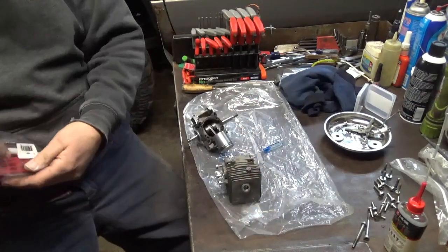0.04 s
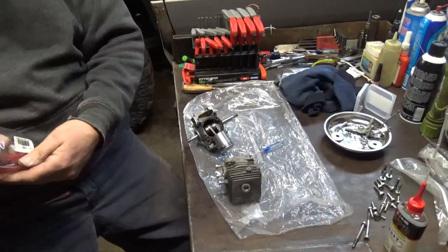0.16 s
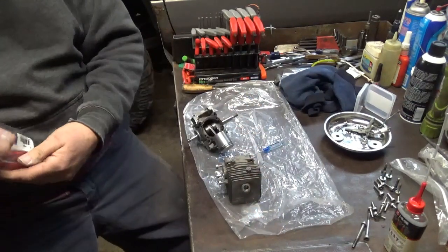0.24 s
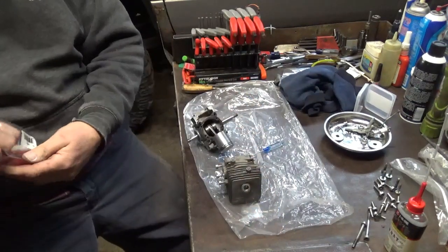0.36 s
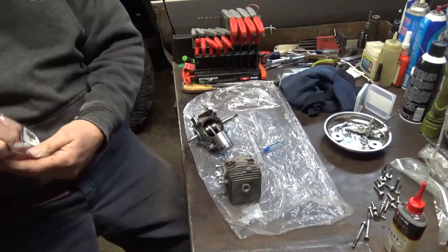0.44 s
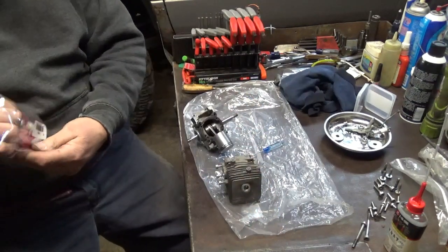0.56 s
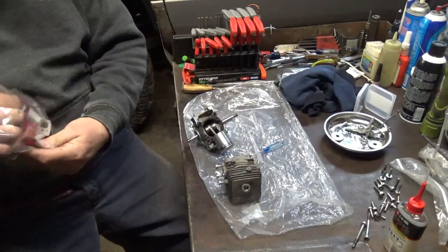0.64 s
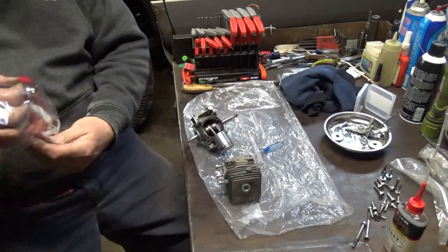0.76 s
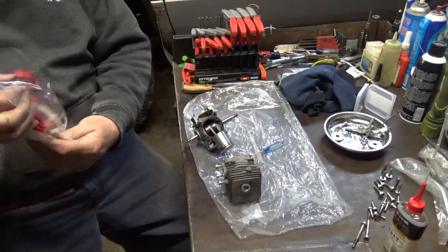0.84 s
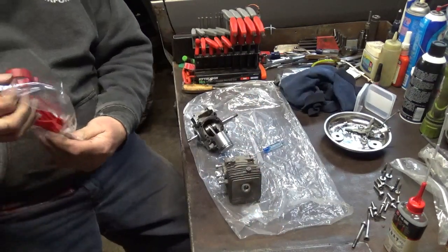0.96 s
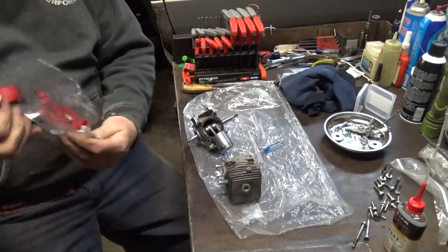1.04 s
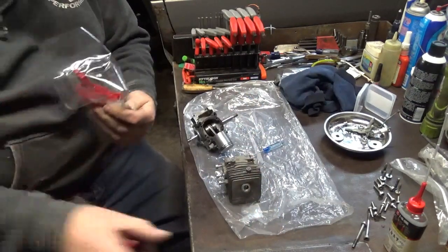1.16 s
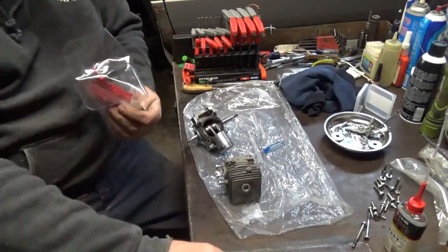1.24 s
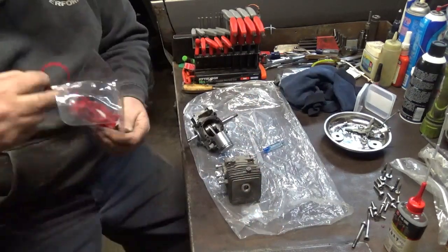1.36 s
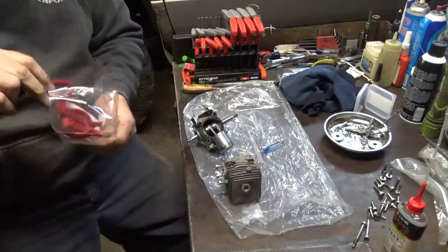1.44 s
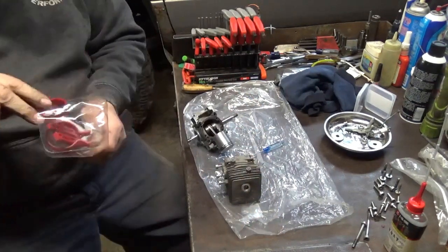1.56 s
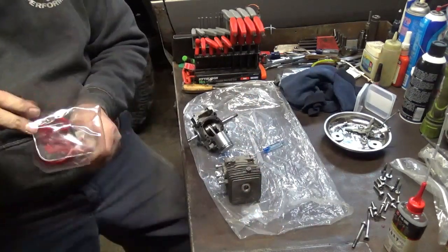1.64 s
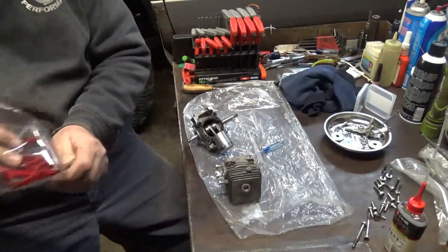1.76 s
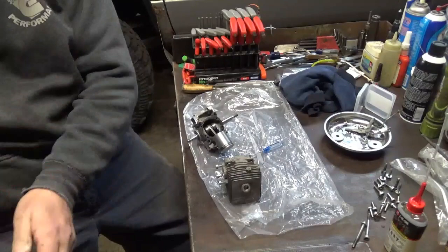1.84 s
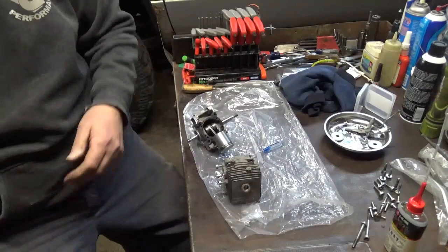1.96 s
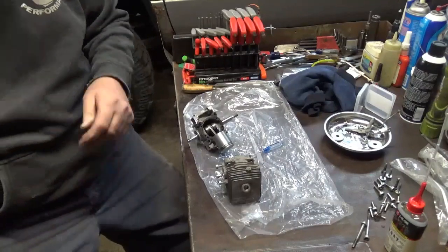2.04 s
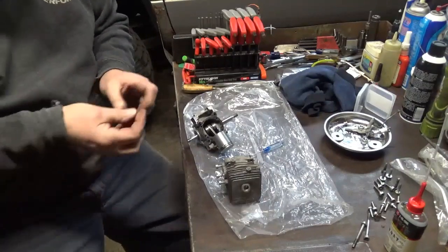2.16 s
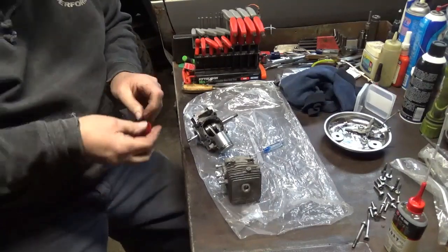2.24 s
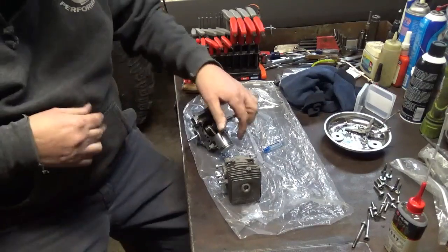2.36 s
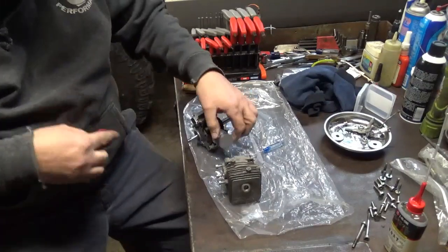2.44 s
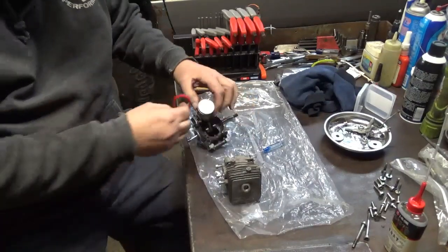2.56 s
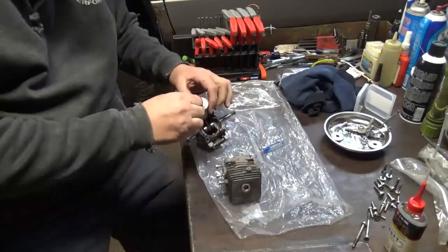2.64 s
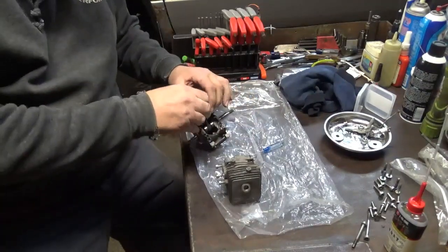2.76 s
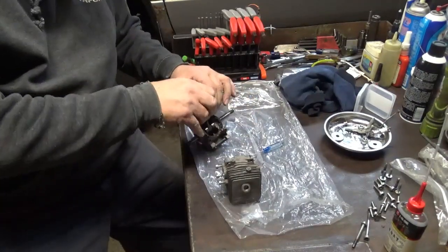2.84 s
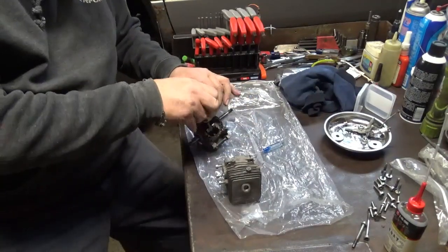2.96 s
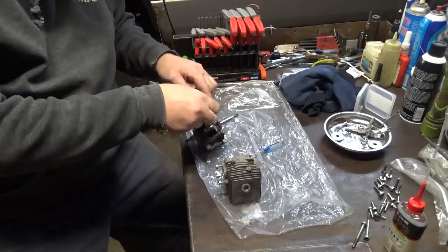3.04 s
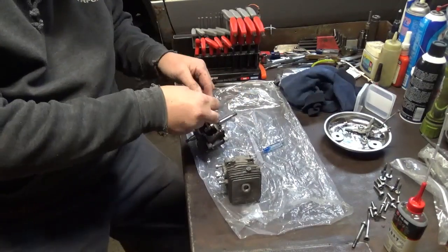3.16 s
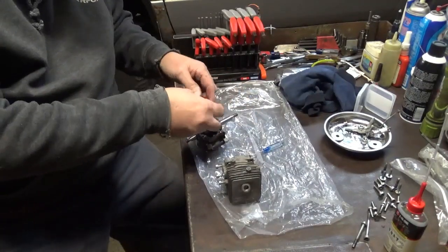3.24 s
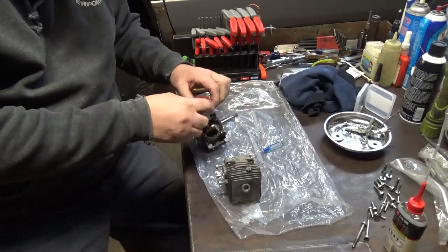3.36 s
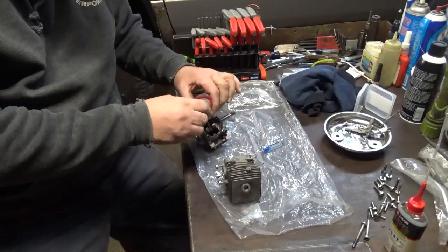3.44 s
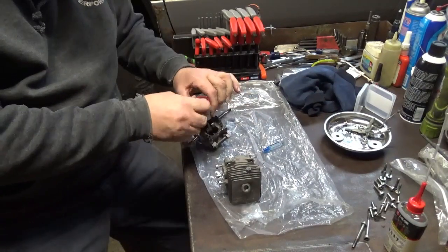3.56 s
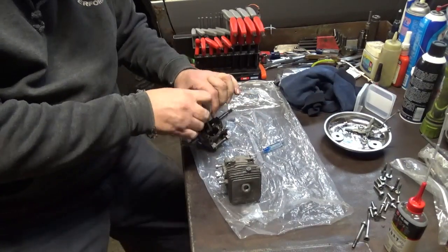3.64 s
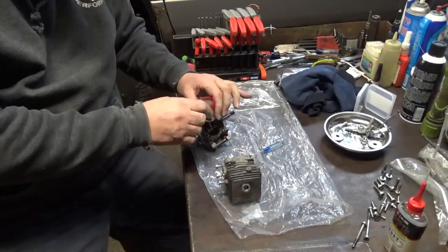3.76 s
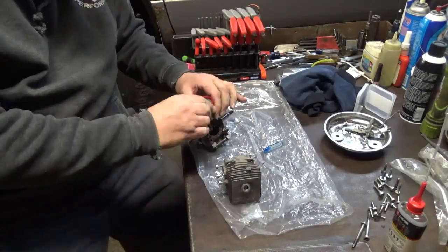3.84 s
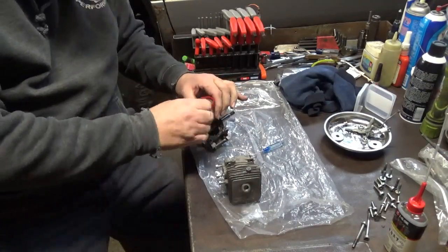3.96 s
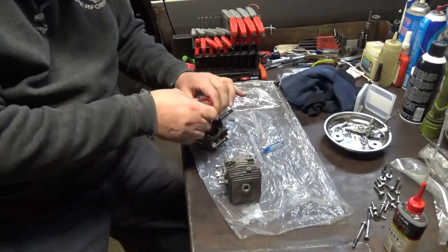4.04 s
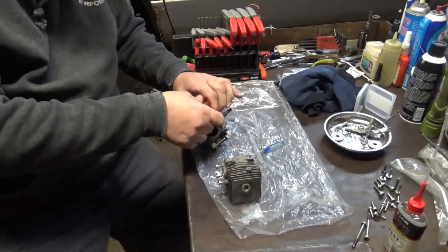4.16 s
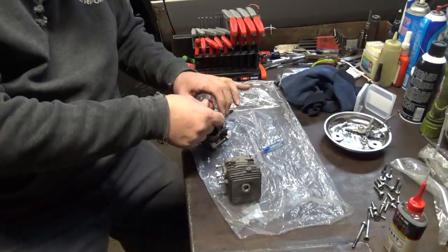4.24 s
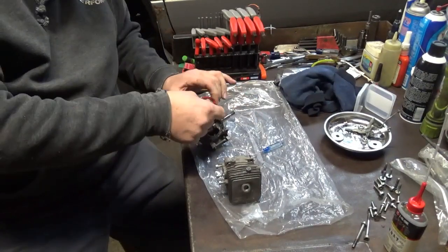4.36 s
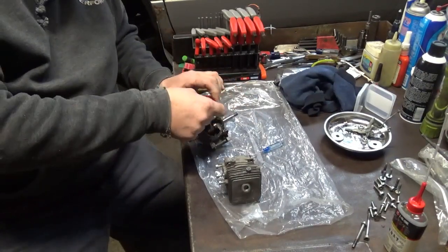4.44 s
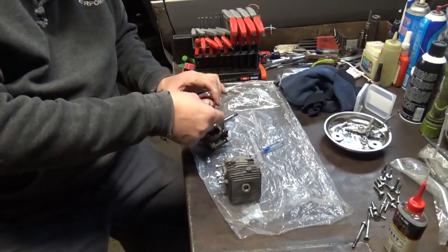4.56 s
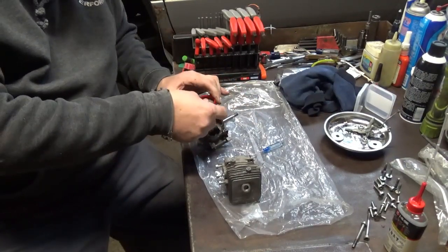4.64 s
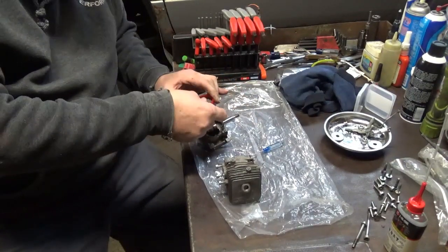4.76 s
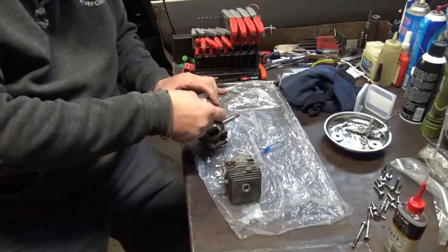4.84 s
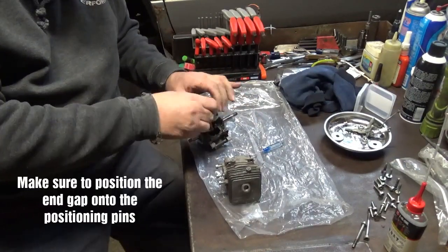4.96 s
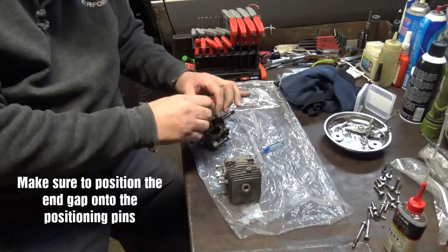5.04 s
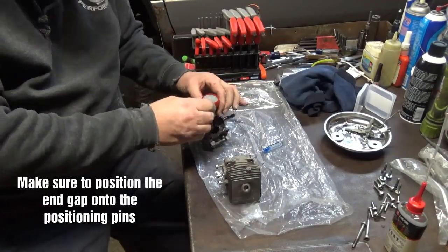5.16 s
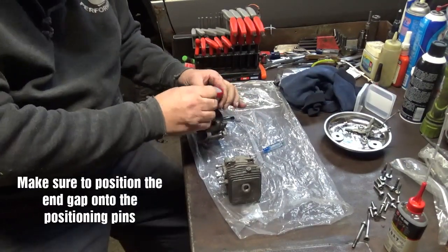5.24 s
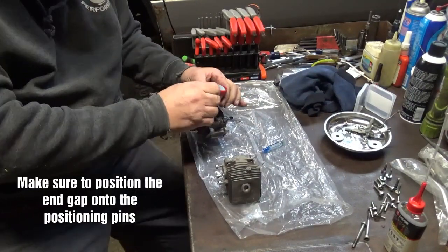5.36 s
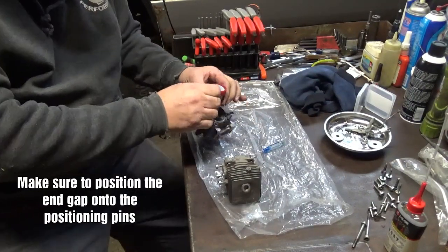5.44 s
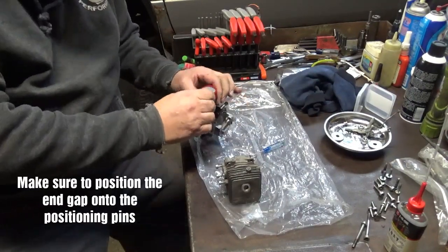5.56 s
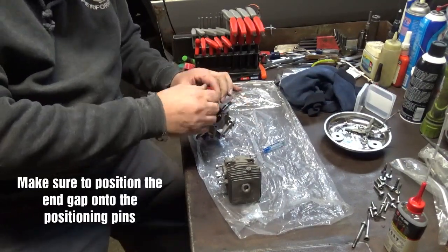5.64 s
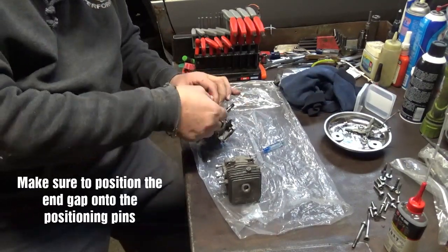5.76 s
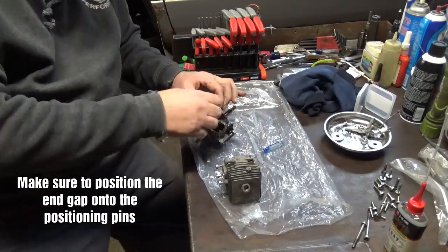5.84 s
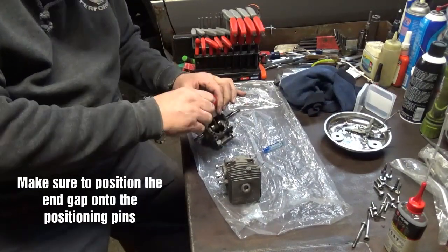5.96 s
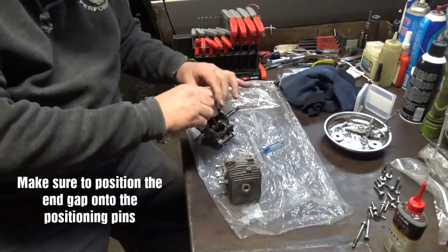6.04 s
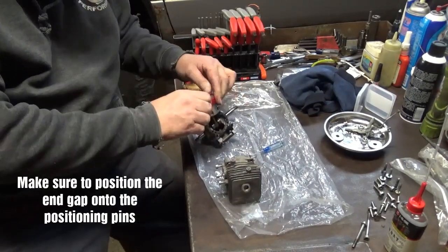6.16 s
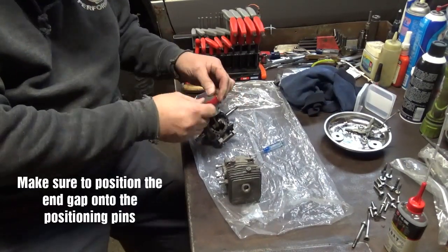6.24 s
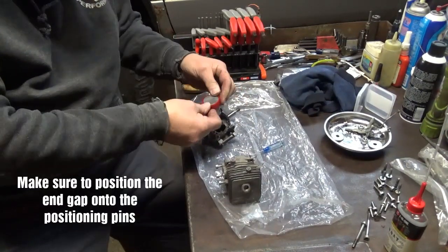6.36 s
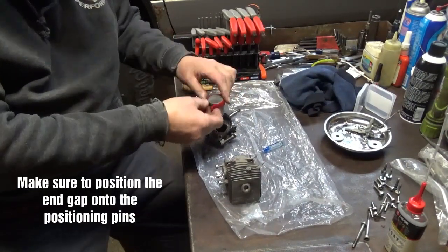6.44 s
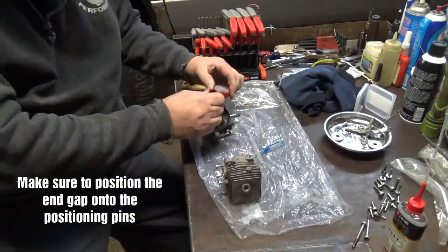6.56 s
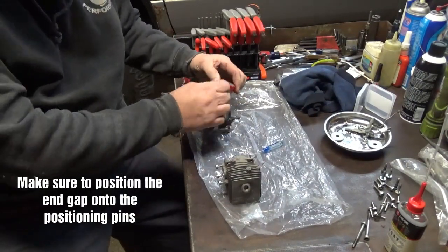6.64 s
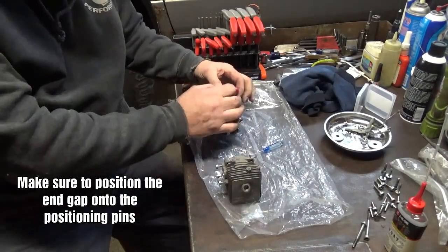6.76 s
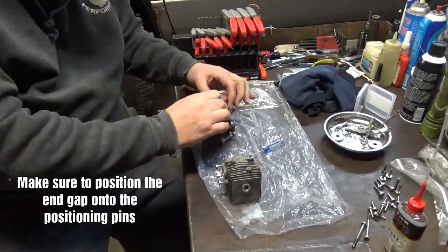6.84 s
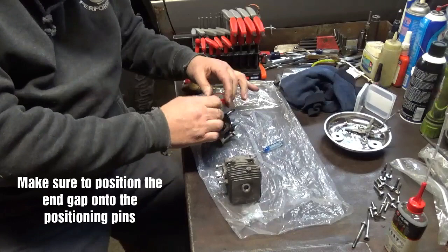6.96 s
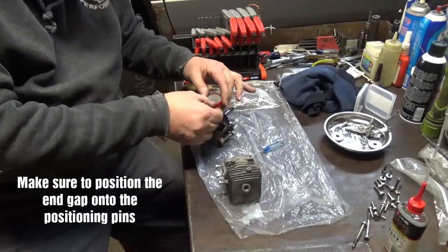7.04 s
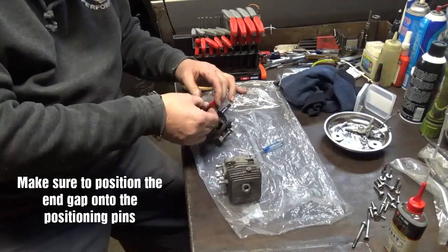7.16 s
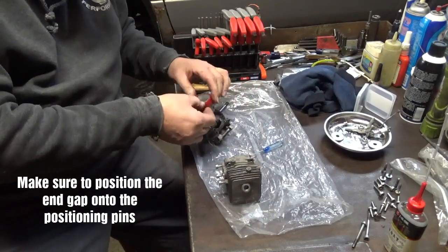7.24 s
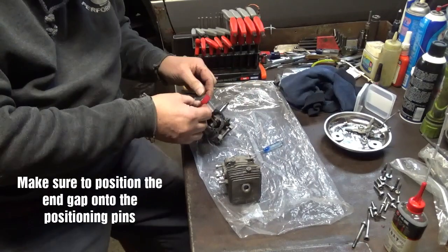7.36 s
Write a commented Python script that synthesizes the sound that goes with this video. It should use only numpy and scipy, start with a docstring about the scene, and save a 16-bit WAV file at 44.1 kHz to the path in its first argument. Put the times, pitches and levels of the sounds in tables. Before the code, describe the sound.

Loud plastic film buckles and snaps close by, turning to dry bright crinkles, then quiet finger rubbing, light clicks and small metallic taps over soft hiss.

```python
"""Hands at a workbench pull open a stiff plastic packet: the taut film buckles with deep ringing cracks that boom.
Opened, the slack film crinkles in bright dry snaps as a small tool is shaken out. Then fingers fit an engine part
on a plastic sheet: light ticks, dull taps, rubbing and a few more snaps. A quiet hiss runs throughout.
Contacts are short noise bursts through resonances, with a grainy tail; rubbing is gritty noise under slow swells."""
import sys
import numpy as np
from scipy import signal
from scipy.fft import rfft, irfft
from scipy.io import wavfile

SR = 44100
rng = np.random.default_rng(int(sys.argv[2]) if len(sys.argv) > 2 else 0)


def int16_out(signal):
    """Quantize to a 16-bit WAV file."""
    q = np.round(np.clip(np.atleast_2d(signal).T, -1, 1) * 32767)
    wavfile.write(sys.argv[1], SR, q.astype(np.int16))


N = 326781

# packet resonances: f/Hz, width/Hz, peak over the rest/dB
PACKET_MODES = [(303, 36, 7), (550, 60, 4), (702, 40, 4.5), (1015.6, 38, 9.5), (1480, 34, 5.5),
                (2650, 45, 0)]
# colour of the opening crackle, dark above 11 kHz: f/Hz, level/dB
OPENING_CRACKLE = [(30, -1), (200, -6.5), (330, -2.5), (1000, 0), (3000, 1), (8000, -3), (10500, -2),
                   (11500, -12.5), (16000, -14.5)]
# colour of slack film: f/Hz, level/dB
SLACK_FILM = [(30, -2), (300, 1.7), (900, -2.2), (2000, 1), (4000, -4), (9000, -0.8), (16000, -0.4)]
SHORT, LONG = 16384, 32768  # samples: one contact, the reverberation
OPEN_S = 1.2  # packet opens and goes slack


def undb(db):
    """Decibels to gain."""
    return 10 ** (np.asarray(db) / 20)


def unit(x, size=None):
    """Scale to rms 1, judged on the first samples if a size is given."""
    return x / np.sqrt(np.mean(x[..., :size] ** 2))


def axis_hz(size):
    """Frequencies of a spectrum."""
    return np.arange(size // 2 + 1) * SR / size


def colour(points, size):
    """Causal (minimum-phase) response through (Hz, dB) points, by folding the cepstrum."""
    hz, db = np.transpose(points)
    level_db = np.interp(np.log(axis_hz(size) + 1), np.log(hz), db)
    cepstrum = irfft(np.log(undb(level_db)), size)
    cepstrum[1:size // 2] *= 2
    cepstrum[size // 2 + 1:] = 0
    return np.exp(rfft(cepstrum))


def resonance(hz, q, size):
    """Band-pass response with gain 1 at its centre."""
    s = 1j * axis_hz(size) / hz
    return s / (s + q * (1 + s * s))


def body(modes, size):
    """Flat response with a peak for each mode."""
    return 1 + sum((undb(db) - 1) * resonance(hz, hz / width, size) for hz, width, db in modes)


def facets(hz, peak_db, count):
    """Every fold frees other facets of film, each with a narrow resonance of its own."""
    centres_hz = np.clip(hz * 2 ** rng.uniform(-1.3, 1.3, count), 250, SR / 3)
    return body([(f, f / 22, peak_db) for f in centres_hz], SHORT)


def shape(x, response):
    """Pass a sound through a response."""
    return irfft(rfft(x) * response, x.shape[-1])


def stereo_noise(side_db, size):
    """Noise common to both ears plus a difference, which close microphones lose in the bass."""
    mid, side = rng.standard_normal((2, size))
    side = signal.lfilter(*signal.butter(1, 900, "high", fs=SR), side)
    return unit(mid + undb(side_db) * side * np.array([[1], [-1]]))


def grit(spread_db, size, count=N):
    """Uneven grip: a new random gain every few samples, rms 1."""
    steps = np.minimum(rng.exponential(size=count // size + 1), 5)
    return unit(np.repeat(undb(spread_db * steps), size)[:count])


def pan(x, left_db):
    """Lean a sound to the left (right if negative)."""
    return x * undb(np.array([[left_db], [-left_db]]) / 2)


def add(out, s, sound):
    """Mix a sound in at a time."""
    start = max(int(s * SR), 0)
    out[:, start:start + sound.shape[1]] += sound[:, :N - start]


def pressure(strokes):
    """How hard the hands press: each stroke swells to its peak and fades at the same pace."""
    t = np.arange(N) / SR
    swells = [undb(db) * np.exp(-np.abs(t - s) / length) for s, length, db in strokes]
    return np.max(swells, axis=0)


def rub(press, response, spread_db, side_db):
    """Countless tiny slips, as strong as the hands press."""
    slips = stereo_noise(side_db, N) * grit(spread_db, size=24)
    return unit(shape(slips, response)) * press


def snaps(rows, material, modes, crack_s, thump_hz, facet_db, low_ratio, low_db, low_t60, grain_db, side_db):
    """Each blow cracks at one resonance and shoves the air; a grainy tail and a lower mode ring on."""
    thump_side_db = -8.5  # how unequally a shove reaches the two ears
    out, t = np.zeros((2, N)), np.arange(SHORT) / SR
    tone, ring = colour(material, SHORT), body(modes, SHORT)
    shove = 1 / (1 + 1j * axis_hz(SHORT) / thump_hz)
    build = 1 - np.exp(-t / .0015)
    for s, db, hz, q, thump_db, tail_db, t60 in rows:
        panel = resonance(hz, max(q, .2), SHORT) * facets(hz, facet_db, count=8)
        ears = 1 + undb(thump_side_db) * rng.standard_normal() * np.array([[1], [-1]])
        thump = undb(thump_db) * shove * ears
        # a sudden slip drives all frequencies nearly alike
        slip = rfft(stereo_noise(side_db - 5.0, SHORT) * np.exp(-t / crack_s))
        slip = slip / np.sqrt(np.abs(slip).mean(axis=0) + 1e-9)
        slip = slip / np.abs(slip).mean()
        crack = unit(irfft(tone * (panel * slip + thump)), size=132)
        # smaller slips follow while the surface settles
        settling = stereo_noise(side_db, SHORT) * grit(grain_db, size=20, count=SHORT)
        tail = unit(shape(settling, tone * ring * (panel + thump / 2)))
        tail = tail * undb(tail_db - 60 * t / t60)
        # low mode, driven by the same slips in reverse order
        low = unit(shape(settling[:, ::-1], ring * resonance(hz * low_ratio, 2.5, SHORT) ** 2))
        low = low * undb(low_db + tail_db - 60 * t / low_t60)
        blow = undb(db) * (crack + build * (tail + low))
        add(out, s, blow[:, :SHORT * 7 // 8])
    return out


def hiss(side_db):
    """Steady hiss of a quiet workshop and the microphone: coloured noise."""
    # f/Hz, level/dB
    hiss_colour = [(18, -41), (30, -10), (48, -22), (98, -18.5), (526, -9), (600, -5.5), (780, -7),
                   (1910, -2.5), (4500, -3.5), (5200, 1.1), (6100, -5.5), (8080, -4.5), (13300, -6.5),
                   (16000, -10.5)]
    return undb(-66) * unit(shape(stereo_noise(side_db, N), colour(hiss_colour, N)))


def fingers():
    """Fingers stroke film and metal; resting, they never lie quite still."""
    # peak t/s, swell and fade time/s, level/dB
    finger_strokes = [(1.25, 0.23, -54.5), (1.58, 0.19, -50), (2.04, 0.076, -50), (2.27, 0.18, -61),
                      (2.78, 0.22, -67), (3.62, 0.38, -63), (4.47, 0.083, -64), (5.29, 0.066, -60.5),
                      (5.8, 0.26, -64), (6.38, 0.12, -68.5), (6.64, .11, -62), (7.26, 0.15, -65.5)]
    # f/Hz, level/dB
    rustle_colour = [(30, -10.5), (400, -5.5), (1000, -3.5), (1900, 1), (5000, 2), (8000, -1.5),
                     (13000, 0.5), (16000, -8)]
    touch_db = -73
    press = np.maximum(pressure(finger_strokes), undb(touch_db))
    return rub(press, colour(rustle_colour, N), spread_db=3.5, side_db=-7.5)


def taps():
    """The part rocks and taps on the bench, exciting its own modes."""
    # t/s, level/dB, f/Hz
    tap_events = [(2.6751, -44, 3010), (3.0726, -52, 4200), (3.3949, -51.5, 2010), (3.5127, -56.5, 3030),
                  (3.792, -49, 2600), (3.8187, -47, 2800), (5.2528, -52, 2670), (5.794, -51, 1550),
                  (5.8384, -53, 2140), (5.903, -41.5, 3200), (6.55, -55.5, 2090), (6.8087, -46.5, 3000),
                  (6.9494, -46.5, 1780)]
    # f/Hz, width/Hz, peak over the rest/dB
    part_modes = [(607.6, 8.6, 30.7), (1020, 25, 25), (1316, 72, 21), (1643, 230, 21), (2760, 190, 16),
                  (3670, 55, 1), (4180, 930, 16), (5000, 64, 0.71)]
    # f/Hz, level/dB
    part_colour = [(30, -9), (300, 3), (600, 1), (1500, -2), (5000, 3.5), (9000, 2), (16000, 4)]
    q, thump_db, tail_db, t60_s = 1.02, -31, 2, 0.076
    knocks = [(s, db, hz, q, thump_db, tail_db, t60_s) for s, db, hz in tap_events]
    return snaps(knocks, part_colour, part_modes, crack_s=0.0035, thump_hz=500, facet_db=0.5,
                 low_ratio=0.357, low_db=-20, low_t60=0.12, grain_db=4.0, side_db=-15.5)


def ticks():
    """Tool and fingernails tick on the part: hard, broadband contacts."""
    # t/s, level/dB, f/Hz, thump/dB
    tick_events = [(2.5159, -51, 6540, -20), (2.8088, -39, 5040, -5.5), (2.986, -44.5, 9500, -7),
                   (3.0168, -45, 2500, 8.5), (3.2443, -51, 4100, -9), (3.688, -50.5, 5750, -3),
                   (3.9763, -39.5, 6810, -14), (4.2656, -49, 8000, -12), (4.3305, -53, 3200, -12),
                   (4.4134, -56.5, 4750, -8), (4.9148, -45.5, 4500, -8), (4.9666, -50, 6100, -0.5),
                   (5.0838, -48.5, 7400, -13), (5.314, -52, 5460, -3), (5.3272, -54, 8200, -8),
                   (5.4451, -55.5, 3220, 2), (6.0369, -41.5, 2450, -6), (6.1891, -50, 5700, -5),
                   (6.57, -51, 9500, 3), (6.625, -49.5, 7660, -6), (6.7992, -53, 8000, -10),
                   (7.1056, -53, 9400, -17.5), (7.1826, -49.5, 3200, -8), (7.261, -56, 4400, -4),
                   (7.2872, -50.5, 7700, -8), (7.344, -58, 3340, -1)]
    # f/Hz, level/dB
    tool_colour = [(30, -3.5), (130, -1.5), (380, 5.5), (900, 2), (2000, 2.5), (4300, -0.5), (9000, 2.5),
                   (13000, 4), (16000, -1)]
    q, tail_db, t60_s = 0.34, -4, 0.049
    contacts = [(s, db, hz, q, thump_db, tail_db, t60_s) for s, db, hz, thump_db in tick_events]
    return snaps(contacts, tool_colour, [], crack_s=0.00052, thump_hz=610, facet_db=2,
                 low_ratio=0.68, low_db=-14, low_t60=0.054, grain_db=0.5, side_db=-12.0)


def fitting():
    """The tool ticks, the part taps the bench and fingers rub on both."""
    return pan(ticks() + taps() + fingers(), left_db=-0.5)


def crackle_swells(q, spread_db, facet_db, side_db):
    """Swells of fine crackle: film dragging, cracks trailing off, fingers rubbing the part; duller while taut."""
    # peak t/s, fall/s, level/dB, centre f/Hz
    swell_events = [(.150, 0.028, -36, 6000), (.200, 0.034, -29.5, 4000), (.580, .02, -42, 7950),
                    (1.010, .03, -66, 1360), (1.059, 0.0086, -27, 3480), (1.172, 0.0075, -27.5, 4280),
                    (1.338, 0.017, -41.5, 5440), (1.447, .009, -33, 3650), (1.556, 0.015, -41, 2960),
                    (1.606, 0.062, -46.5, 5230), (1.764, 0.0034, -36, 4470), (1.809, 0.03, -39, 3480),
                    (1.882, 0.01, -31, 4340), (1.915, 0.0056, -33, 4000), (1.957, 0.024, -50.5, 3000),
                    (2.043, 0.0046, -29, 6300), (2.077, 0.015, -38.5, 4600), (2.102, .006, -41, 4960),
                    (2.310, 0.093, -59.5, 14600), (4.46, 0.0093, -62.5, 1650), (5.04, .016, -61, 1810),
                    (5.099, 0.015, -60.5, 1720), (5.906, 0.0045, -51.5, 4780), (6.644, .005, -61, 3600)]
    rise_share = .7  # rise time over fall time
    out, t = np.zeros((2, N)), (np.arange(SHORT) - SHORT // 4) / SR
    slips = stereo_noise(side_db, N) * grit(spread_db, size=16)
    taut, slack = colour(OPENING_CRACKLE, SHORT), colour(SLACK_FILM, SHORT)
    for s, fall, db, hz in swell_events:
        start = max(int((s + t[0]) * SR), 0)
        since = start / SR + np.arange(SHORT) / SR - s
        tone = taut if s < OPEN_S else slack
        response = tone * resonance(hz, q, SHORT) * facets(hz, facet_db, count=6)
        crackle = unit(shape(slips[:, start:start + SHORT], response))
        swell = np.exp(-np.maximum(-since / (rise_share * fall), since / fall))
        add(out, start / SR, undb(db) * crackle * swell)
    return out


def creases(press, centre_hz, octaves, cycles, db, spread_db, count):
    """Small creases flip at random in the taut packet: pings of a few cycles, louder the harder it is pressed."""
    out, t = np.zeros((2, N)), np.arange(SHORT // 16) / SR
    for when, pitch, size, place in rng.random((count, 4)):
        s = when * OPEN_S
        hz = min(centre_hz * 2 ** (octaves * (2 * pitch - 1)), SR / 4)
        ping = np.sin(2 * np.pi * hz * t) * np.exp(-t * hz / cycles)
        gain = press[int(s * SR)] * undb(db + spread_db * size ** 3)
        add(out, s, pan(ping * gain, left_db=6 * (place - 2.0)))
    return out


def rustle():
    """Hands tug at the closed packet: its film rubs and small creases flip."""
    # peak t/s, swell and fade time/s, level/dB
    tugs = [(.01, 0.14, -39), (.21, 0.15, -35.5), (.59, 0.12, -36.5), (.77, 0.11, -35.5),
            (1.04, 0.062, -40), (1.175, 0.017, -38)]
    # f/Hz, level/dB
    rustle_colour = [(30, -29), (200, -13.5), (330, -10), (700, -1), (1100, -2.5), (2000, -2), (4000, -7.5),
                     (9000, -9.5), (10800, -16.5), (11600, -25), (16000, -31.5)]
    pull = pressure(tugs)
    response = colour(rustle_colour, N) * body(PACKET_MODES, N)
    rubbing = rub(pull, response, spread_db=2.5, side_db=-8.5)
    return rubbing + creases(pull, centre_hz=2420, octaves=1.7, cycles=3.2, db=-0.5, spread_db=10, count=160)


def boom(x, t60, wet_db, side_db):
    """Hollow reverberation that hangs on after the cracks: convolution with decaying noise."""
    # f/Hz, level/dB
    boom_colour = [(30, -17), (200, -12.5), (400, -4), (1100, -9.5), (2500, -2.5), (5000, -9),
                   (10000, -4.5), (16000, -16.5)]
    response = colour(boom_colour, LONG) * body(PACKET_MODES, LONG)
    decay = unit(shape(stereo_noise(side_db, LONG), response))
    decay = decay * undb(-60 * np.arange(LONG) / SR / t60)
    mono = x.mean(axis=0)[None]
    return undb(wet_db) * signal.fftconvolve(mono, unit(decay) / np.sqrt(LONG), axes=1)[:, :N]


def crinkles():
    """Creases of slack film snap, in the packet and later in the sheet; sharper ones thump less."""
    # t/s, level/dB, f/Hz, Q
    crinkle_events = [(1.1995, -27, 4490, 0.74), (1.202, -25, 4400, 0.25), (1.2707, -41, 4250, 9.9),
                      (1.2974, -44.5, 5330, 0.3), (1.3258, -38, 3500, 0.21), (1.3355, -34.5, 8800, 0.41),
                      (1.4791, -34.5, 4900, 3.5), (1.4962, -38, 5150, 4), (1.5114, -39, 4150, 0.9),
                      (1.5418, -23, 5200, 1.2), (1.553, -34, 5130, 1.3), (1.5604, -34, 2970, 6),
                      (1.584, -21.5, 5430, 1.6), (1.6382, -20, 8600, 0.19), (1.6822, -33.5, 4970, 0.47),
                      (1.712, -40, 5200, 3.8), (1.7879, -22.5, 4270, 0.21), (1.7917, -29, 5000, 0.56),
                      (1.8264, -31, 5170, 0.19), (1.8324, -24.5, 5300, 0.72), (1.8899, -26, 4270, 3.7),
                      (1.9037, -29.5, 4670, 2.9), (1.909, -29, 5300, 1.5), (1.9629, -25, 4030, 4.9),
                      (1.979, -32.5, 3900, 2.2), (2.0017, -40.5, 2800, 2.2), (2.012, -39, 7850, 1.4),
                      (2.0248, -25, 5270, 1.6), (2.035, -18.5, 5530, 1.3), (2.2294, -25, 7020, 0.47),
                      (5.6505, -52, 4800, 1.8), (5.9047, -40.5, 4680, 4), (6.9959, -51, 3780, 6)]
    thump_db, thump_fall_db = -17.5, 16.5  # at Q 1; fall per tenfold Q
    tail_db, t60_s = -4, 0.056
    folds = [(s, db, hz, q, thump_db - thump_fall_db * np.log10(q), tail_db, t60_s)
             for s, db, hz, q in crinkle_events]
    return snaps(folds, SLACK_FILM, [], crack_s=0.0016, thump_hz=494, facet_db=8,
                 low_ratio=0.55, low_db=-9.5, low_t60=0.062, grain_db=2.0, side_db=-11.5)


def buckles():
    """Taut panels buckle; higher ones crack more broadly and rattle longer, each by a power of pitch."""
    # t/s, level/dB, panel f/Hz, tail/dB
    buckle_events = [(0.0279, -27.5, 1300, -11.5), (0.0726, -25.5, 1430, -9.5), (0.0824, -19, 1780, -6),
                     (0.1125, -25.5, 610, 0), (0.1276, -21.5, 3800, -2.5), (0.1765, -19, 4800, -5),
                     (0.2559, -20, 1270, -9.5), (0.2694, -16.5, 1280, -3), (0.3117, -30, 1445, -7.5),
                     (0.3642, -30.5, 1790, -8.5), (0.4673, -38.5, 840, -6), (0.505, -28.5, 1840, 0.5),
                     (0.5204, -17, 2910, -4.5), (0.5588, -20.5, 7500, -8), (0.6049, -19.5, 2970, -7),
                     (0.7105, -25, 1030, 0), (0.7187, -19, 1430, -1.5), (0.7436, -28.5, 766, -1.5),
                     (0.7842, -26, 652, -10.5), (0.8726, -16.5, 1350, -2), (1.1054, -37, 702, 3)]
    ref_hz, ref_q, ref_t60_s = 1000, .71, .08
    broadening, lengthening, thump_db = .65, .7, -23  # two exponents, dB
    panels = [(s, db, hz, ref_q * (ref_hz / hz) ** broadening, thump_db, tail_db,
               ref_t60_s * (hz / ref_hz) ** lengthening) for s, db, hz, tail_db in buckle_events]
    return snaps(panels, OPENING_CRACKLE, PACKET_MODES, crack_s=0.0021, thump_hz=500, facet_db=6.5,
                 low_ratio=.62, low_db=-13.0, low_t60=0.31, grain_db=2.5, side_db=-8.5)


def packet():
    """Pulled taut the film buckles and booms; slack it crinkles; swells of fine crackle run through both."""
    cracks = buckles()
    hollow = boom(cracks, t60=.4, wet_db=-16.5, side_db=-14.5)
    taut = pan(cracks, left_db=1.5) + pan(rustle() + hollow, left_db=2.5)
    fine_crackle = crackle_swells(q=0.46, spread_db=4.0, facet_db=10.0, side_db=-13.5)
    return taut + pan(crinkles() + fine_crackle, left_db=1.45)


def scene():
    """The packet, then the fitting, over the hiss."""
    return hiss(side_db=-3.0) + fitting() + packet()


def record(dry):
    """The recorder cuts the top, above 16 kHz."""
    return signal.sosfilt(signal.ellip(10, .2, 80, 16000, fs=SR, output="sos"), dry)


dry = scene()
out = record(dry)
int16_out(out)
```